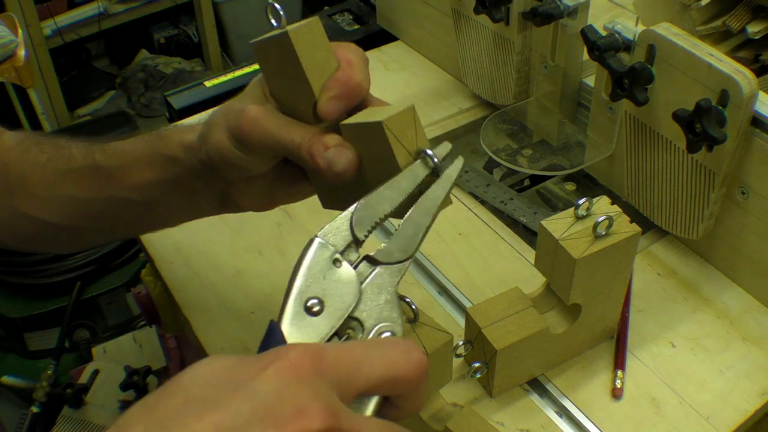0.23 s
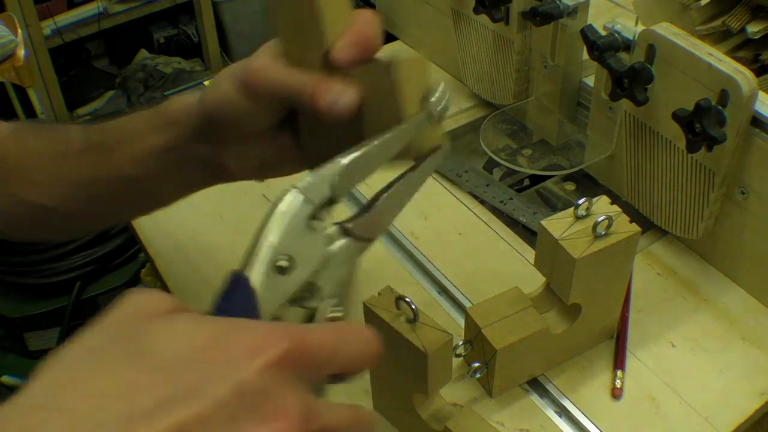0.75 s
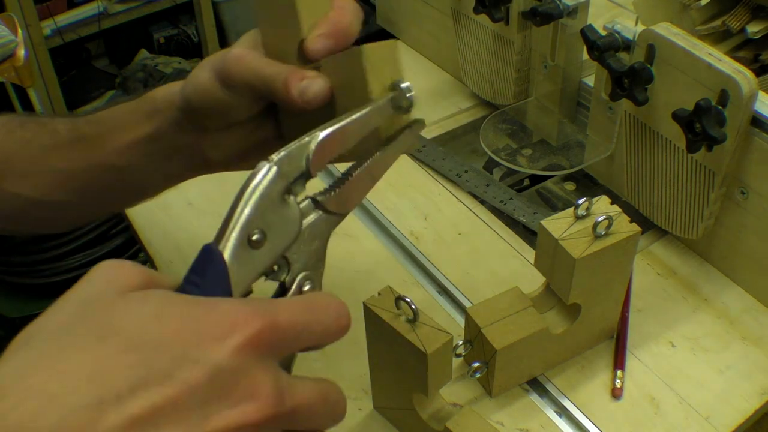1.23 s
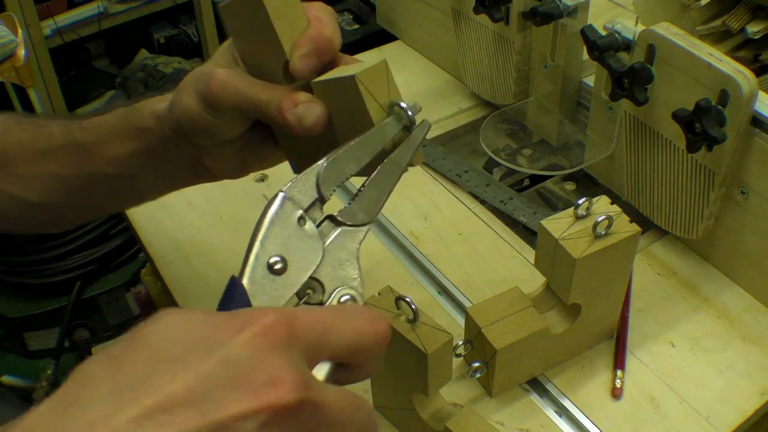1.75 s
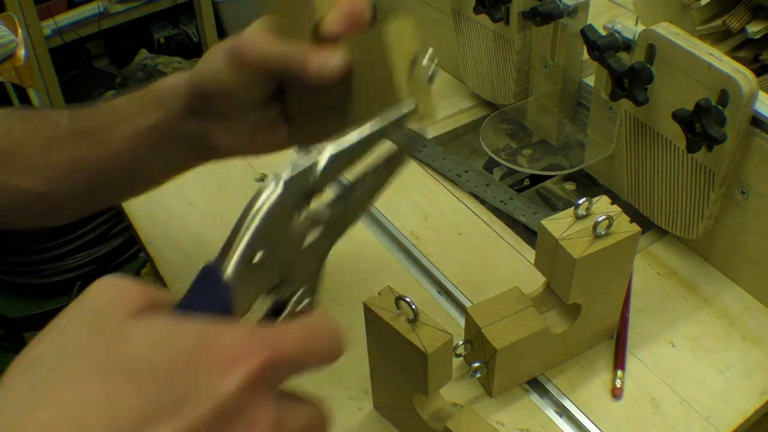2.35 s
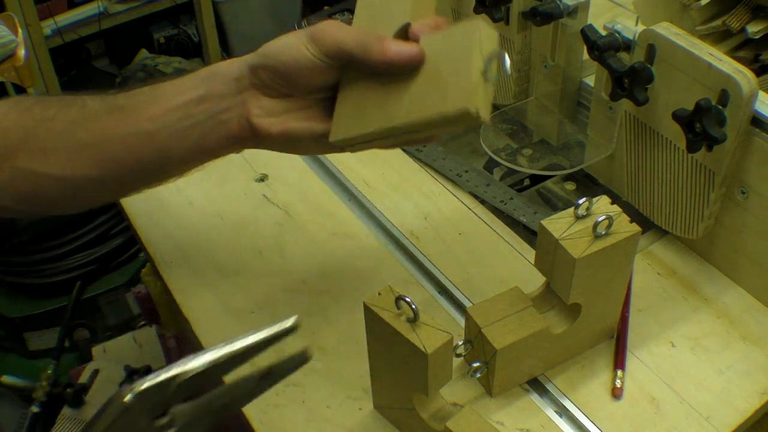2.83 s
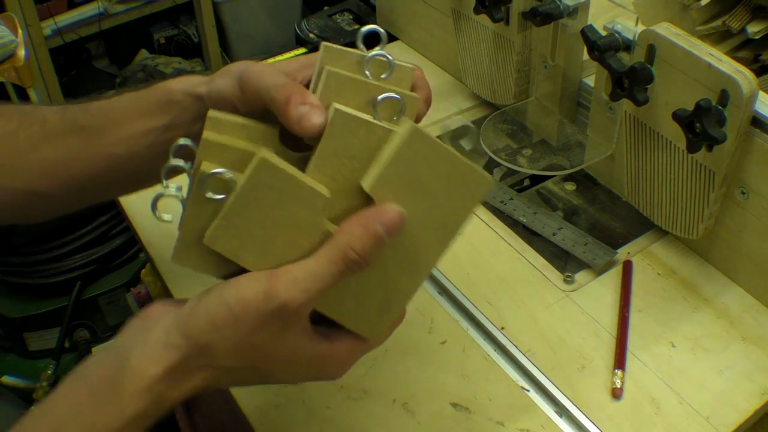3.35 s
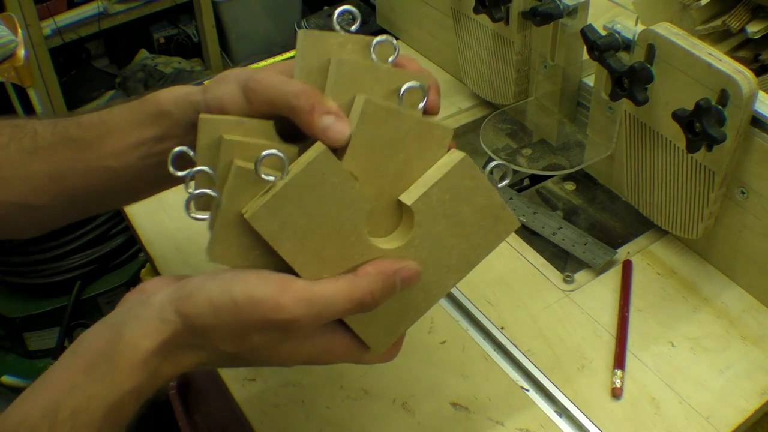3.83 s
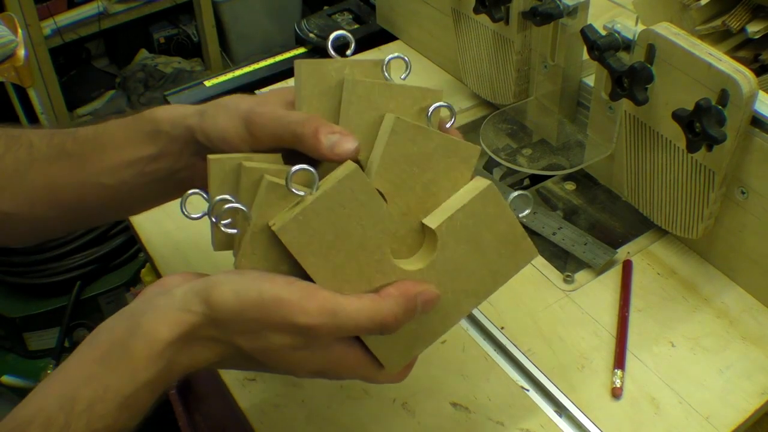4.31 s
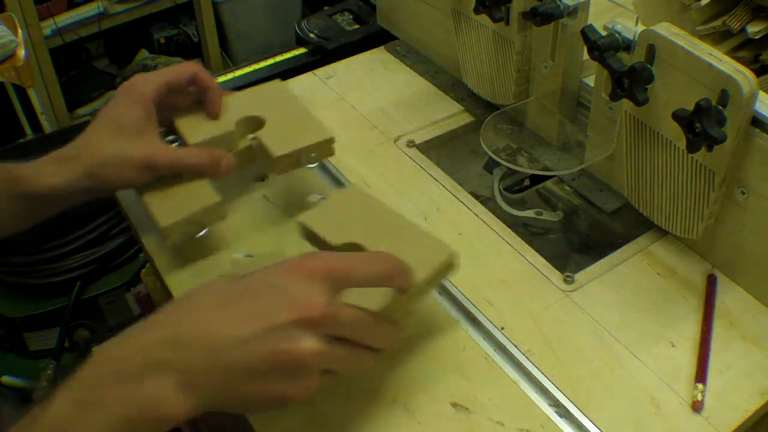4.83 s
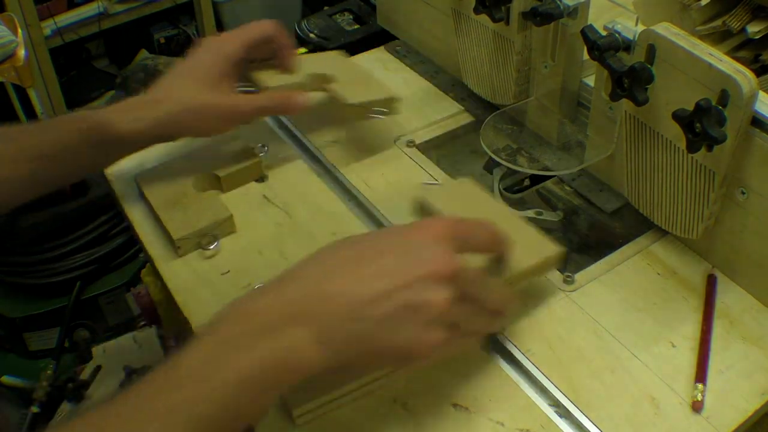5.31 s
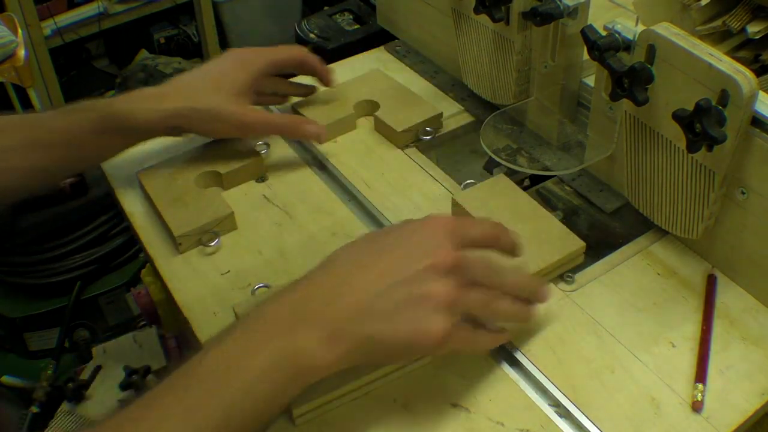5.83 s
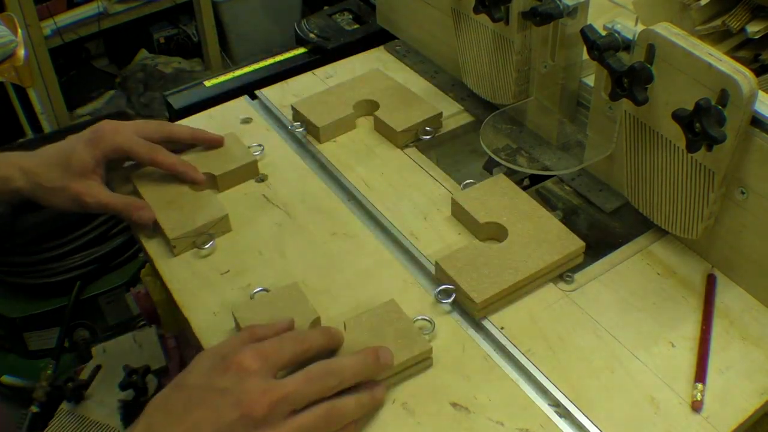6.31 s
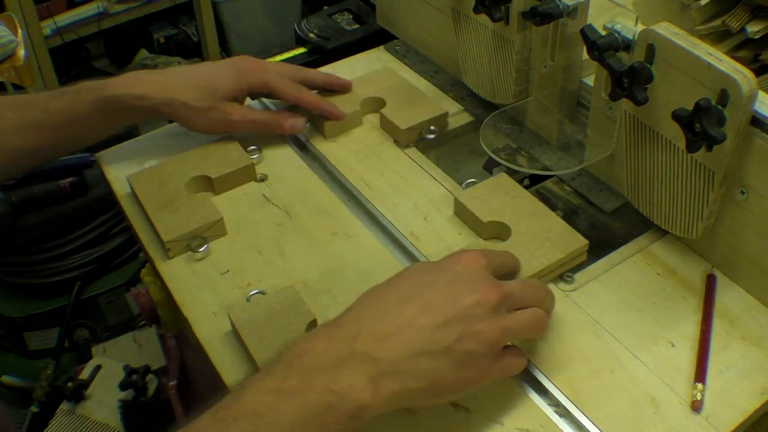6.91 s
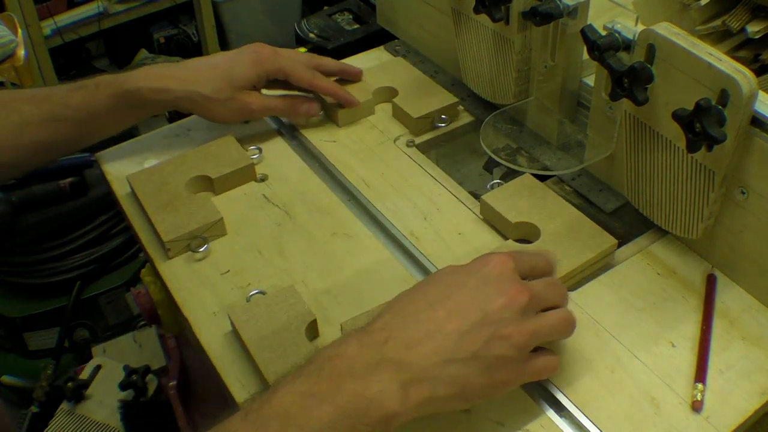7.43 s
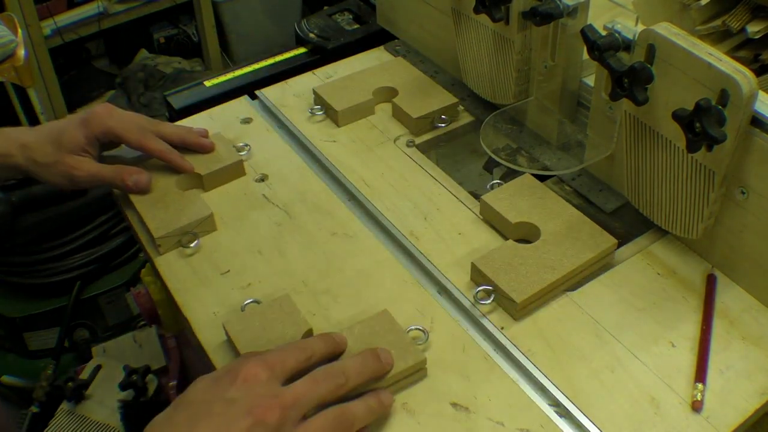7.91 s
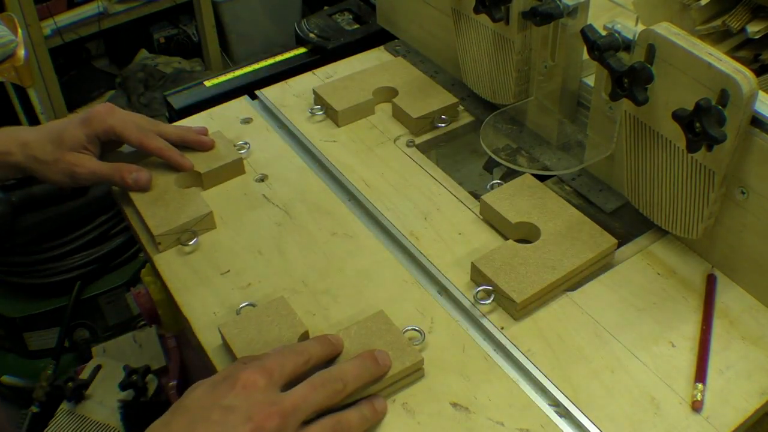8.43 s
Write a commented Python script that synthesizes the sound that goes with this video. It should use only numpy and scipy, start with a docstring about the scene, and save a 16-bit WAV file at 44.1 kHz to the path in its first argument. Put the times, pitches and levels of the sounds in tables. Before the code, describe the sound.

Bright steel clicks and short gritty creaks come first, in three bursts, as pliers slip off small metal eyes. Next come quiet papery swishes of wood on wood, then two tight volleys of hard, hollow wooden clacks, by far the loudest sounds. Finally blocks are nudged over the table with soft scrapes and woody groans. Close, dry small-room sound with faint mains hum and hiss.

```python
"""Locking pliers grind on screw eyes in small wooden blocks and snap off them three times in the first seconds.
The blocks are then fanned out in the hands with a dry rasp, clacked down on a wooden work table and pushed
about on it, scraping and groaning, with two soft finger taps near the end. Snaps and knocks are noise cracks
with decaying sines; grinding, rubbing and sliding are trains of tiny filtered slips. A small workshop with a
faint mains hum lies underneath; a steady hiss spreads wide across the stereo; one close microphone."""
import sys
import numpy as np
from scipy import signal
from scipy.fft import rfft, irfft
from scipy.io import wavfile

SR = 44100
rng = np.random.default_rng(int(sys.argv[2]) if len(sys.argv) > 2 else 0)


def log_audio(samples):
    """Write samples as a 16-bit WAV file to the path given in sys.argv[1]."""
    # one column per channel
    frames = np.atleast_2d(samples).T
    # limit to full scale, then quantise
    limited = np.clip(frames, -1, 1)
    pcm = np.round(limited * 32767).astype(np.int16)
    wavfile.write(sys.argv[1], SR, pcm)


N = 382126
TIME = np.arange(N) / SR

# Colour of the soft room air. Each row: frequency in Hz, density in dB per Hz.
AIR_COLOUR = [(20, -37.5), (35, -11.5), (55, -1), (90, -7), (135, -10.5), (195, -7), (260, -20.5),
              (400, -7), (620, -20.5), (1900, -29), (2220, -26), (2700, -28.5), (12000, -34), (16000, -42)]
AIR_DB = -67
# Mains hum and thin electrical whine. Each row: frequency in Hz, rms level in dB.
HUM_TONES = [(100, -78), (199.6, -73.5), (300, -78), (399, -78.5), (2196, -85.5), (11143, -98)]
# Colour of the steady hiss that widens the stereo. Each row: frequency in Hz, density in dB per Hz.
HISS_COLOUR = [(18, -44.5), (30, -15.5), (184, -4.5), (266, -12.5), (384, -1.5), (822, -14), (889, -12.5),
               (3220, -12), (16000, -18.5)]
WIDE_HISS_DB = -73.5
# Reverberation of the workshop. Each row: frequency in Hz, 60 dB decay time in seconds.
ROOM_DECAY = [(100, 0.65), (300, 0.24), (800, 0.21), (1800, 0.26), (3400, 0.27), (7000, .23),
              (14000, 0.049)]
# Upper end of the microphone's range
CUTOFF_HZ = 15900

# Blocks pushed and nudged over the table. Each row: start in seconds, swelling in seconds,
# easing in seconds, scrape in dB, groan of the block in dB, rumble of the table in dB.
PUSH_STROKES = [(6.275, .1, 0.058, -53.5, -48, -54.5), (6.815, 0.034, 0.021, -50.5, -51.5, -57.5),
                (6.88, 0.077, 0.061, -49.5, -48, -62.5), (7.01, 0.16, 0.034, -48, -41, -59),
                (7.195, 0.026, 0.14, -54.5, -52.5, -63), (7.824, 0.044, 0.066, -47.5, -42, -51),
                (7.93, 0.021, 0.04, -57.5, -51.5, -49.5), (8.195, 0.017, 0.017, -67.5, -58, -53),
                (8.275, 0.081, 0.049, -66, -56.5, -58), (8.49, 0.017, .01, -57.5, -53, -58),
                (8.55, 0.0089, .012, -55, -44.5, -57), (8.58, 0.033, 0.025, -51.5, -42.5, -49.5)]
# Colour of the scrape. Each row: frequency in Hz, density in dB per Hz.
SCRAPE_SPECTRUM = [(350, -18.5), (600, -0.5), (869, -5), (1260, -12.5), (1510, -9), (1850, -15.5),
                   (2210, -8), (2570, -14), (3250, -6.5), (4160, -22), (11700, -29), (16000, -39)]
# Resonances of a sliding block. Each row: frequency in Hz, width in Hz, level in dB.
GROAN_MODES = [(302, 170, -12.5), (400.4, 60, 0.5), (470, 64, 0.5), (544, 104, -5.5)]
# The table under a sliding block. Each row: frequency in Hz, width in Hz, level in dB.
TABLE_RUMBLE_MODES = [(83, 28, -6.5), (136, 60, -6.5), (198, 55, 4.5), (247, 80, 3)]

# Rasping and hissing swells, mostly of rubbed blocks, with faint ones among the knocks.
# Each row: start in seconds, swelling in seconds, easing in seconds, level in dB,
# fine hiss against the rasp in dB.
RASP_SWELLS = [(2.977, 0.0087, 0.016, -44.5, -8.5), (3.048, 0.042, 0.046, -54.5, -6),
               (3.122, 0.052, 0.035, -42.5, -2.5), (3.2, 0.056, 0.021, -48, -5),
               (3.325, 0.032, 0.11, -50, -4.5), (3.475, .04, .028, -49.5, -2.5),
               (3.56, 0.11, 0.045, -55, -2), (3.714, 0.13, 0.089, -49.5, -5),
               (3.96, 0.077, 0.077, -72.5, 2), (4.13, 0.033, .13, -56.5, -6),
               (4.67, 0.059, .014, -62.5, -1), (5.05, 0.062, 0.017, -72, 12),
               (5.455, .015, 0.073, -60.5, 2.5), (5.8, 0.07, 0.054, -61.5, -14.5),
               (6.04, .08, 0.13, -64, -10)]
# Colour of the rubbed wood. Each row: frequency in Hz, density in dB per Hz.
RUB_SPECTRUM = [(180, -55), (300, -19), (348, -32), (624, -19.5), (1190, -18.5), (1750, -8), (2280, -10.5),
                (2520, -17), (3350, -2), (4520, -22.5), (5430, -13.5), (7690, -17), (8790, -16.5),
                (13800, -20.5), (16000, -30)]
# Resonances of the rubbed blocks. Each entry: frequency in Hz.
RUBBED_BLOCK_HZ = [1720, 2151, 3050, 3387, 3890]

# A stroke takes hold, swells to its fastest moment, eases and lets go
GRAB_S = 0.021
SWELL_DB, EASE_DB = 5, 6  # below the fastest moment, at the start and at the end
LET_GO_DB_PER_S = 700.5

# Knocks of wood, and two soft finger taps near the end.
# Each row: time in seconds, level in dB, hardness in dB, edge click in dB.
KNOCKS_AND_TAPS = [(.003, -52, -7.5, -2), (0.9595, -53.5, -15, -5.5), (1.7355, -58, 1, 11),
                   (1.824, -53, 6.5, 9.5), (2.5932, -46, 6, 4.5), (3.109, -41, -11, 14),
                   (3.451, -56, -10, 0), (5.004, -18, 0, 2.5), (5.013, -11, -3, -3.5), (5.0205, -15, 0, -4),
                   (5.025, -14, -3, 5.5), (5.031, -16, -0.5, -2), (5.4342, -16, -15, -3.5),
                   (5.460, -12, -7, -2.5), (5.481, -20.5, -6, -0.5), (5.492, -20.5, -11.5, -0.5),
                   (5.558, -14.5, -4, -0.5), (5.609, -6.5, 14.5, 1.5), (5.649, -11.5, 11.5, -12),
                   (5.673, -20.5, 8.5, -14.5), (5.951, -46.5, -5, 0), (8.108, -52, -21, 13),
                   (8.347, -57, -21, 3)]
# Dense, quickly damped modes of wood. Each row: frequency in Hz, density in dB per Hz.
WOOD_CRACK_COLOUR = [(30, -54.5), (80, -22.5), (160, -22), (260, -8.5), (470, 1.5), (620, -3), (850, -3.5),
                     (1600, -14), (2150, -16.5), (2600, -24), (3250, -14.5), (3800, -26.5), (4400, -33),
                     (10000, -45.5), (15500, -51.5)]
# Ringing of a block. Each row: frequency in Hz, level in dB, 60 dB decay time in seconds.
BLOCK_RING = [(388, -8.5, 0.04), (501, 1.5, .055), (723.6, 0, 0.013), (822.3, 1, 0.025), (950, -9.5, 0.016),
              (1010, -10.5, 0.084), (1285, -16, .05), (1480, -17, 0.081), (1750, -16, 0.016),
              (2090, -20, 0.045), (3020, -27, 0.074), (3240, -25.5, 0.1), (3710, -28, 0.056)]
# Ringing of the table top. Each row: frequency in Hz, level in dB, 60 dB decay time in seconds.
TABLE_RING = [(75, -16, 0.56), (98, -20.5, 1.4), (114.9, -13.5, 0.31), (149, -12, 0.22), (197, -7, 0.28),
              (224.3, -11, 1.05), (260, -2.5, 0.14), (310, -9, 0.12), (391, -1, 0.45), (400, -9.5, 1.2),
              (472, -3.5, 0.71), (497, 2, 0.22)]
# The table top hums this far from a knock, and more after a harder one (dB, dB per dB of hardness)
TABLE_HUM_DB, HUM_PER_HARDNESS = -32, 0.6

# Each twist of the pliers. Each row: slip of the jaws in seconds, gripping before that in seconds,
# grinding at the slip in dB, ping of the freed jaw in dB.
PLIER_TWISTS = [(.765, .19, -30.5, -54.5), (1.214, 0.026, -38.5, -55), (1.254, .006, -41, -55),
                (1.329, .05, -32.5, -33.5), (2.322, .16, -46.5, -42.5)]
# Grinding swells with the strain, from a quiet creak, and dies after the slip
STRAIN_DB_PER_S, CREAK_DB, SLACK_DB_PER_S = 311, -73.5, 419.5
# Steel clicks of the screw eyes. Each row: time in seconds, level in dB, wooden body in dB, treble in dB.
EYE_SNAPS = [(0.5672, -46, -11.5, -14.5), (0.6277, -60, -10.5, -6), (0.694, -45, 4.5, -12),
             (0.723, -35, 2, -9.5), (.740, -27, -2.5, -6), (.756, -27.5, -1, 1), (0.764, -26.5, -4.5, 3.5),
             (.773, -24, -3, 0), (0.787, -39.5, 5, 6), (1.2112, -27.5, 6, 7.5), (1.253, -26.5, -13, -12),
             (1.3046, -33, 7, 1), (1.3213, -18.5, 3, 7), (1.329, -22, -1, 16), (1.3585, -42, -5, 9),
             (1.4043, -41.5, -15, 3), (1.4616, -49.5, -4, -4), (2.1613, -58.5, 9, -28),
             (2.209, -60, 8, -12), (2.305, -37.5, 8.5, 2), (2.3145, -29.5, -0.5, 3),
             (2.3183, -29, 5.5, -22), (2.327, -28, -12, 0), (2.3325, -27, -3, -2.5), (2.3872, -45, -18, 3),
             (2.4116, -46.5, 2, 5), (2.5406, -54, -23.5, -23), (5.6081, -23.5, -7, 1.5)]
# Dense, quickly damped modes of steel. Each row: frequency in Hz, density in dB per Hz.
STEEL_CRACK_COLOUR = [(60, -25.5), (110, -20), (270, -23), (480, -5.5), (650, -9.5), (1150, -15),
                      (1700, -6.5), (2220, -0.5), (2650, -4.5), (3350, 2.5), (3850, -7), (5000, -3.5),
                      (6200, -10), (8400, -10), (12400, -20), (14200, -15), (16000, -18.5)]
# Ringing of the gripped eye. Each row: frequency in Hz, level in dB, 60 dB decay time in seconds.
EYE_RING = [(444, -10.5, 0.057), (652, -14, 0.12), (1638, -7, 0.09), (2220, -4.5, 0.07),
            (2380, -7.5, 0.022), (3120, -2.5, 0.068), (3444, 0.5, 0.05), (4230, -10, 0.026),
            (4940, -0.5, 0.036), (5150, -4, 0.025), (7100, -3.5, 0.03), (8080, -6, 0.06),
            (8620, -20.5, 0.013), (9800, -15.5, 0.026)]
# Ringing of the freed jaw. Each row: frequency in Hz, level in dB, 60 dB decay time in seconds.
JAW_RING = [(2046, -12.5, 0.27), (4200, -9, .11), (4950, 2.5, 0.24), (6850, -14, 0.18), (9040, -11.5, .19),
            (10230, -10.5, .15), (13770, -11, .19), (13960, -10, .16)]
# The eye squeaks once in the jaws. In order: start in seconds, length in seconds, pitch in Hz, peak in dB.
EYE_SQUEAK = (.698, .014, 1600, -39)


def from_db(db):
    """Decibels to gain."""
    return 10 ** (np.asarray(db) / 20)


def rms_one(x):
    """Scale to rms 1."""
    return x / np.sqrt(np.mean(x ** 2) + 1e-20)


def attack_one(x, size=256):
    """Scale a blow so that its first milliseconds have rms 1."""
    return x / np.sqrt(np.mean(x[:size] ** 2) + 1e-20)


def at_hz(points, hz):
    """Read a table on a log-frequency axis."""
    known_hz, values = np.transpose(points)
    return np.interp(np.log(np.maximum(hz, 1)), np.log(known_hz), values)


def band(x, hz, kind, order=2):
    """Butterworth filter."""
    return signal.sosfilt(signal.butter(order, hz, kind, fs=SR, output="sos"), x)


def coloured(x, spectrum, size=4096):
    """Causal (minimum-phase) filter with the given spectrum."""
    level_db = at_hz(spectrum, np.fft.rfftfreq(size, 1 / SR))
    cepstrum = irfft(np.log(from_db(level_db)))
    # folding the cepstrum forward in time makes the phase minimal
    cepstrum[1:size // 2] *= 2
    cepstrum[size // 2 + 1:] = 0
    impulse = irfft(np.exp(rfft(cepstrum)))
    return signal.fftconvolve(x, impulse)[:len(x)]


def peak(x, hz, q):
    """One resonance, at rms 1."""
    return rms_one(signal.lfilter(*signal.iirpeak(hz, q, fs=SR), x))


def resonate(x, modes):
    """Drive parallel resonances of alternating sign; rms 1."""
    total = 0
    for k, (hz, width, db) in enumerate(modes):
        total = total + (-1) ** k * from_db(db) * peak(x, hz, hz / width)
    return rms_one(total)


def dying(t, t60):
    """Exponential decay by 60 dB in t60 seconds."""
    return np.exp(-np.log(1000) * t / t60)


def add(out, s, sound):
    """Mix a sound in at a time."""
    part = out[int(s * SR):][:len(sound)]
    part += sound[:len(part)]


def ringing(modes, t, spread_db):
    """Each blow lands elsewhere and gives every mode a strength and sign of its own."""
    hz, db, t60 = np.transpose(modes)
    sign = rng.choice([-1, 1], len(hz))
    strength = sign * from_db(db + spread_db * rng.standard_normal(len(hz)))
    tones = np.sin(2 * np.pi * hz[:, None] * t) * dying(t, t60[:, None])
    return attack_one(strength @ tones)


def blow(modes, spectrum, crack_t60, ring_db):
    """A short crack of dense modes, and the few that ring on."""
    t = TIME[:SR // 8]
    burst = rng.standard_normal(len(t)) * dying(t, crack_t60)
    crack = attack_one(coloured(burst, spectrum))
    return crack + from_db(ring_db) * ringing(modes, t, spread_db=0.5)


def friction(per_s, size_db, judder_db, judder_hz):
    """Tiny slips of uneven size, bunched by the judder of the hand."""
    slips = (rng.random(N) < per_s / SR) * rng.standard_normal(N)
    sizes_db = size_db * np.minimum(rng.exponential(1, N), 4)
    judder = rms_one(band(rng.standard_normal(N), judder_hz, "low"))
    return slips * from_db(sizes_db + judder_db * judder)


def stroke(start, swell_s, ease_s):
    """Gain over time of one movement."""
    t, length = TIME - start, swell_s + ease_s
    speed_db = np.interp(t, [0, swell_s, length], [-SWELL_DB, 0, -EASE_DB])
    let_go_db = LET_GO_DB_PER_S * np.clip(t - length, 0, 1)
    return np.clip(t / GRAB_S, 0, 1) * from_db(speed_db - let_go_db)


def strokes(rows):
    """The movement in each row, and the level columns that go with them."""
    return np.array([stroke(*row[:3]) for row in rows]), np.transpose(rows)[3:]


def room_tone():
    """Soft low air noise with mains hum and a thin electrical whine."""
    tone = from_db(AIR_DB) * rms_one(coloured(rng.standard_normal(N), AIR_COLOUR))
    for hz, db in HUM_TONES:
        phase = rng.random()  # in cycles
        tone += from_db(db) * np.sqrt(2) * np.sin(2 * np.pi * (hz * TIME + phase))
    return tone


def wide_hiss():
    """Steady coloured hiss, used with opposite signs in left and right to widen the stereo."""
    return from_db(WIDE_HISS_DB) * rms_one(coloured(rng.standard_normal(N), HISS_COLOUR))


def workshop(x, wet_db, build_s):
    """Reflections from cluttered walls build up quickly and die band by band."""
    t = TIME[:SR * 2 // 3]
    edges = np.geomspace(50, 18000, 13)
    tail = np.zeros(len(t))
    for low, high in zip(edges, edges[1:]):
        t60 = at_hz(ROOM_DECAY, np.sqrt(low * high))
        tail += band(rng.standard_normal(len(t)), [low, high], "band") * dying(t, t60)
    tail *= 1 - np.exp(-(t / build_s) ** 2)
    return from_db(wet_db) * signal.fftconvolve(x, tail / np.linalg.norm(tail))[:N]


def sliding():
    """Blocks scrape along the table; their coarser slips make the block groan and the table rumble."""
    fine_slips = friction(per_s=5000, size_db=-1.0, judder_db=0.5, judder_hz=62.6)
    scrape = rms_one(coloured(fine_slips, SCRAPE_SPECTRUM))
    coarse_slips = friction(per_s=1000, size_db=3.0, judder_db=1.0, judder_hz=45.5)
    groan = rms_one(band(resonate(coarse_slips, GROAN_MODES), [260, 800], "band"))
    rumble = rms_one(band(resonate(coarse_slips, TABLE_RUMBLE_MODES), 360, "low"))
    moves, levels_db = strokes(PUSH_STROKES)
    return sum(from_db(db) @ moves * layer for db, layer in zip(levels_db, (scrape, groan, rumble)))


def rasping():
    """Dry rasp and hiss of tiny slips, mostly of rubbed blocks; it favours now one resonance, now another."""
    slips = friction(per_s=7000, size_db=-0.1, judder_db=0.8, judder_hz=69.13)
    fibres = coloured(slips, RUB_SPECTRUM)
    rasp = rms_one(band(fibres, 4500, "low", order=4))
    hiss = rms_one(band(fibres, 5000, "high", order=4))
    for hz in RUBBED_BLOCK_HZ:
        contact = rms_one(band(rng.standard_normal(N), 7, "low"))
        rasp = rasp + from_db(-17 + 5 * contact) * peak(fibres, hz, 45)
    moves, (db, hiss_db) = strokes(RASP_SWELLS)
    return from_db(db) @ moves * rms_one(rasp) + from_db(db + hiss_db) @ moves * hiss


def knocks_and_taps():
    """Soft contacts thud, hard ones clack; each sets the table top humming, the hard ones more."""
    out = np.zeros(N)
    for s, db, hard_db, edge_db in KNOCKS_AND_TAPS:
        knock = blow(BLOCK_RING, WOOD_CRACK_COLOUR, crack_t60=0.03, ring_db=-2.5)
        knock = coloured(knock, [(750, 0), (3000, hard_db), (4000, hard_db), (7000, hard_db + edge_db)])
        # a small block radiates little bass
        knock = band(knock, 120, "high")
        add(out, s, from_db(db) * attack_one(knock))
        hum_db = db + TABLE_HUM_DB + HUM_PER_HARDNESS * hard_db
        add(out, s, from_db(hum_db) * ringing(TABLE_RING, TIME[:SR * 3 // 4], spread_db=1.0))
    return out


def strain(slip, grip_s, db):
    """Gain over time of the grinding in one twist."""
    t = TIME - slip
    build = from_db(db - STRAIN_DB_PER_S * np.clip(-t, 0, 1)) + from_db(CREAK_DB)
    slack = from_db(-SLACK_DB_PER_S * np.clip(t, 0, 1))
    return np.clip((t + grip_s) / GRAB_S, 0, 1) * build * slack


def grinding():
    """The jaws grind on the eye in tiny steel slips, then skip off it and leave a jaw pinging."""
    slips = friction(per_s=4000, size_db=0.5, judder_db=3.5, judder_hz=88)
    grit = rms_one(coloured(slips, STEEL_CRACK_COLOUR))
    out = np.zeros(N)
    for slip, grip_s, db, ping_db in PLIER_TWISTS:
        out += strain(slip, grip_s, db) * grit
        add(out, slip, from_db(ping_db) * ringing(JAW_RING, TIME[:SR // 3], spread_db=1.0))
    return out


def squeak():
    """The eye squeaks in the jaws: one short sine under a half-sine swell."""
    out = np.zeros(N)
    s, length, hz, db = EYE_SQUEAK
    t = TIME[:int(length * SR)]
    add(out, s, from_db(db) * np.sin(np.pi * t / length) * np.sin(2 * np.pi * hz * t))
    return out


def snaps():
    """Bursts of steel snaps jolt the block: each a crack and a ring, with its own wooden body and treble."""
    out = np.zeros(N)
    for s, db, body_db, treble_db in EYE_SNAPS:
        snap = blow(EYE_RING, STEEL_CRACK_COLOUR, crack_t60=0.019, ring_db=-4.5)
        snap = coloured(snap, [(900, body_db), (2000, 0), (4500, 0), (10000, treble_db)])
        add(out, s, from_db(db) * attack_one(snap))
    return out


def scene():
    """Work in the hands and on the table, centred; hiss and a trace of reflections widen the stereo."""
    hands = grinding() + snaps() + squeak() + rasping()
    table = knocks_and_taps() + sliding()
    mid = hands + workshop(hands, wet_db=-15.5, build_s=0.0087) + room_tone()
    mid = mid + table + workshop(table, wet_db=-10.0, build_s=0.0066)
    side = wide_hiss() + workshop(mid, wet_db=-43.5, build_s=.003)
    return np.array([mid + side, mid - side])


def record(dry):
    """The microphone rounds off loud peaks, sheds the deepest bass and cuts the top."""
    rounded = 1.4 * np.tanh(dry / 1.4)
    lean = band(rounded, 38, "high")
    # a steep low-pass: 0.2 dB ripple, 95 dB down above the cutoff
    return signal.sosfilt(signal.ellip(10, .2, 95, CUTOFF_HZ, fs=SR, output="sos"), lean)


dry = scene()
out = record(dry)
log_audio(out)
```